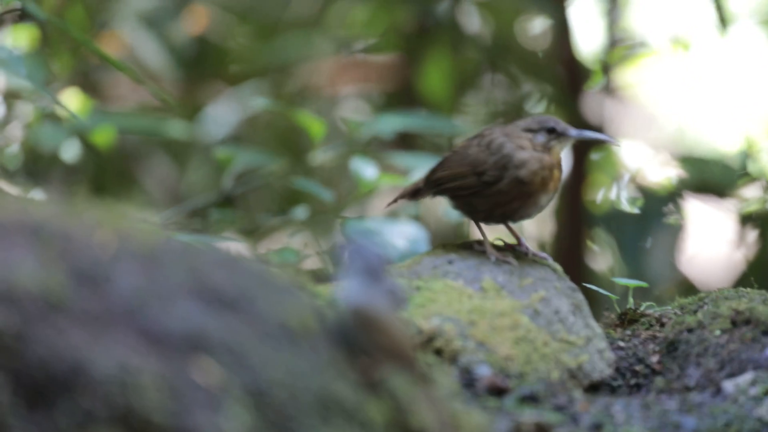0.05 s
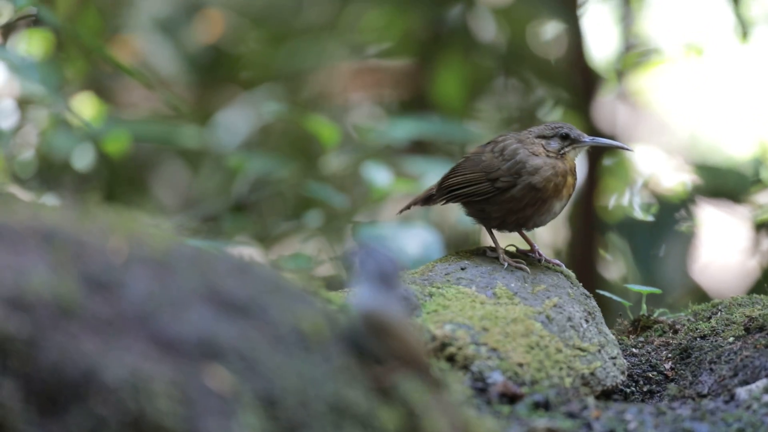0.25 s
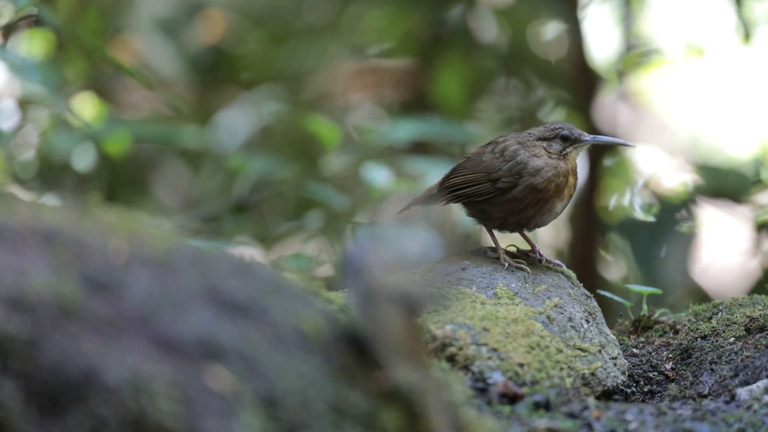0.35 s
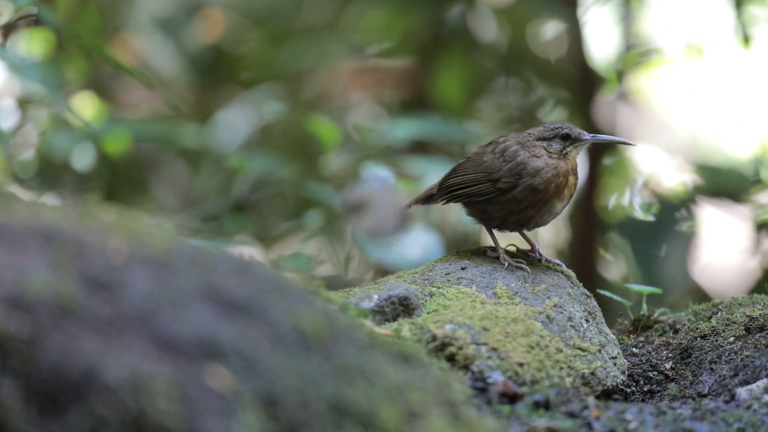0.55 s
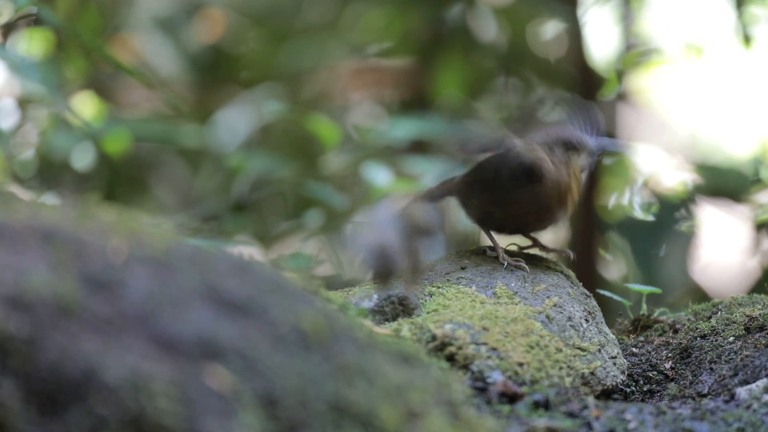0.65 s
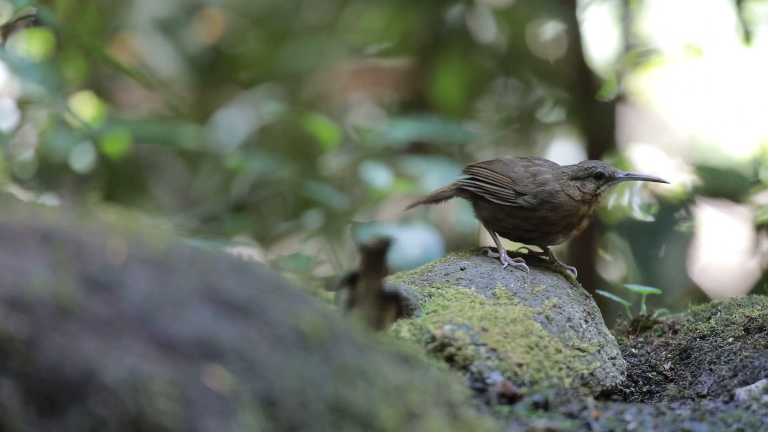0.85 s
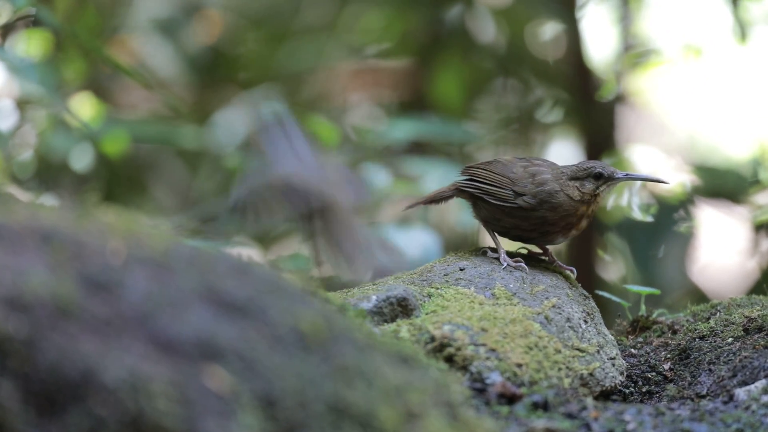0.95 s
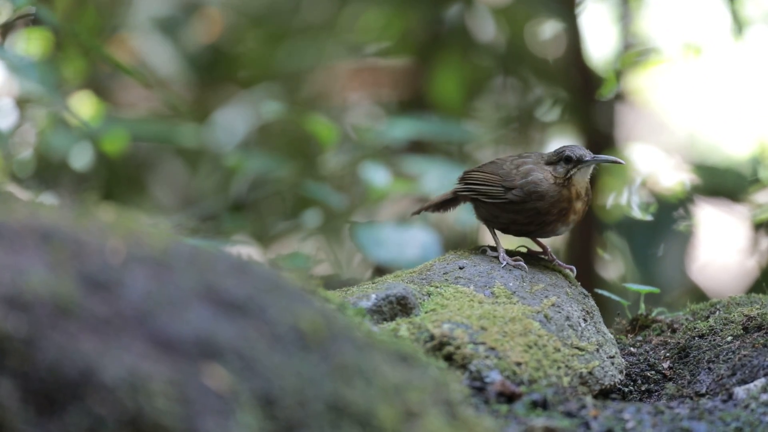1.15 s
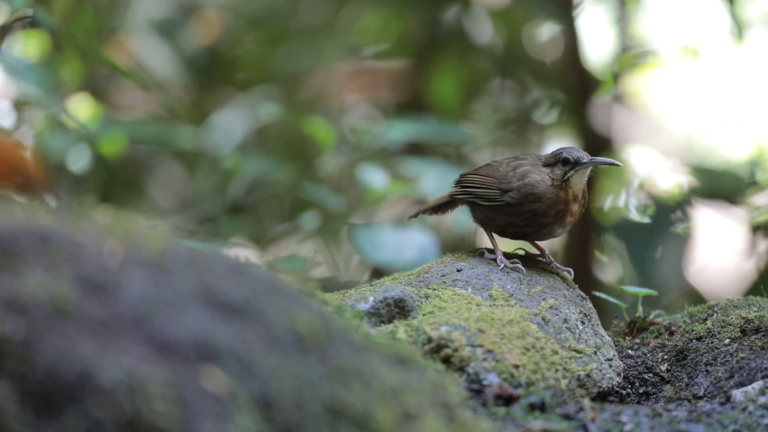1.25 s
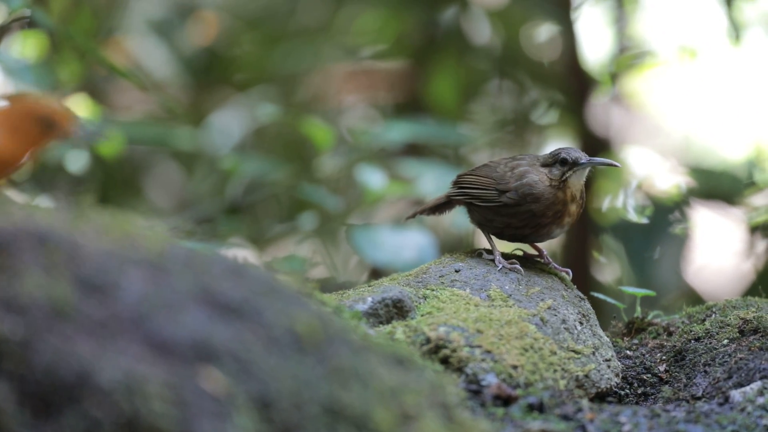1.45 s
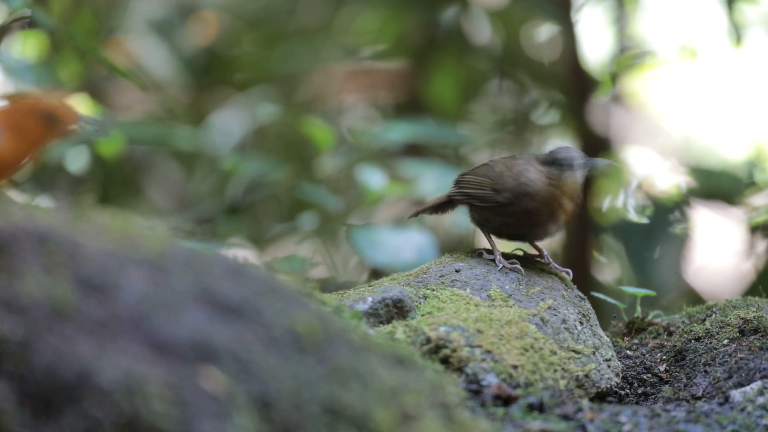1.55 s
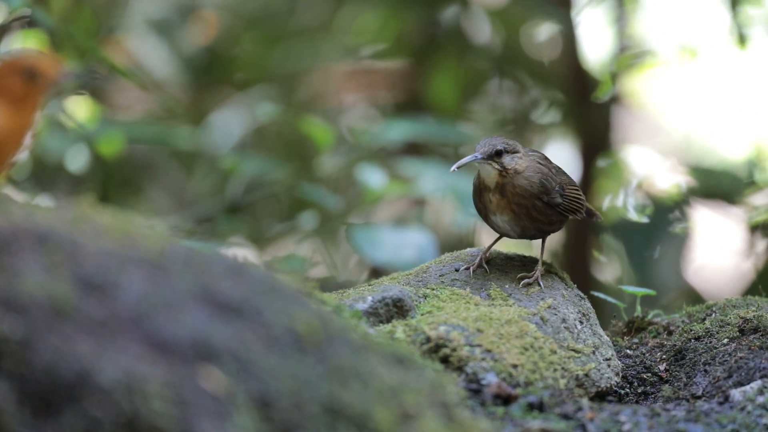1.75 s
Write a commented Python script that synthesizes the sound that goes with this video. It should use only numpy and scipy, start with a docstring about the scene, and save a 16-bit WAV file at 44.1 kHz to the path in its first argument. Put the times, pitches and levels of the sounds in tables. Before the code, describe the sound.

A thin bird whistle and two echoing downward notes sound in a quiet forest, along with whirring wings, a leaf rustle and soft hops. A second short flutter follows nearby, ending in a twig tick and a light scuff.

```python
"""In a forest, a bird gives a thin whistle and two falling slurs, which the trunks scatter into a long echo.
Small birds flit close by: one whirs past with buzzing feathers and soft thumps of air, lands and hops;
another flaps with a feathery swish. Leaves rustle, feet scuff, a far call blurs through the trees
and a twig ticks, all over a low murmur of air and a faint hiss."""
import sys
import numpy as np
from scipy import signal
from scipy.fft import rfft, irfft
from scipy.io import wavfile
from scipy.ndimage import uniform_filter1d

SR = 44100
rng = np.random.default_rng(int(sys.argv[2]) if len(sys.argv) > 2 else 0)


def generate_wav(sig):
    """Save sig (samples, or channels by samples) to the path in sys.argv[1] as 16-bit PCM at SR."""
    pcm = np.round(np.clip(np.atleast_2d(sig).T, -1, 1) * 32767).astype(np.int16)
    wavfile.write(sys.argv[1], SR, pcm)


N = 79380
FOREST_T60_S, FOREST_BUILD_S, SCATTER_DB = 0.8, 0.0082, 4.5


def undb(db):
    """Decibels to gain."""
    return 10 ** (np.asarray(db) / 20)


def clock():
    """Time of each sample in seconds."""
    return np.arange(N) / SR


def noise(points):
    """Noise of rms 1 with a spectrum of (Hz, dB) points, falling 20 dB an octave beyond its ends."""
    hz, db = np.array(points, float).T
    octave = np.log2(np.maximum(np.fft.rfftfreq(N, 1 / SR), 1))
    beyond = np.abs(octave - np.clip(octave, np.log2(hz[0]), np.log2(hz[-1])))
    gain = undb(np.interp(octave, np.log2(hz), db) - 20 * beyond)
    coloured = irfft(rfft(rng.standard_normal(N)) * gain, N)
    return coloured / coloured.std()


def walk(rate):
    """Smooth random motion of spread 1, quicker at a higher rate."""
    span = max(int(SR / rate), 1)
    motion = uniform_filter1d(uniform_filter1d(rng.standard_normal(N), span), span)
    return motion / motion.std()


def swell(at, rise, fall):
    """An envelope that peaks at the given time; rise and fall are time constants in seconds."""
    t = clock() - at
    return np.exp(np.minimum(t / rise, -t / fall))


def grain(at, hz, width, glide=0):
    """A few cycles under a bell-shaped envelope, gliding by a share of the pitch per second."""
    t = clock() - at
    pitch = hz * (1 + .012 * rng.standard_normal())
    cycles = pitch * (t + .5 * glide * t * t) + rng.random()
    return np.exp(-.5 * (t / width) ** 2) * np.sin(2 * np.pi * cycles)


def echo(sound, build_s=FOREST_BUILD_S):
    """Distinct returns from near trunks, then dense scatter from the forest behind."""
    # Slaps off the nearest trunks. Each row: delay in seconds, level in dB.
    trunks = [(.005, -9), (.0135, -8.5), (.0192, -12), (.025, -15), (.03, -5), (.042, -23), (.069, -12),
              (.08, -8), (.0965, -20)]
    t = clock()
    tail = rng.standard_normal(N) * undb(-60 * t / FOREST_T60_S) * (1 - np.exp(-t / build_s))
    tail *= undb(SCATTER_DB) / np.sqrt(np.sum(tail ** 2))
    for delay, db in trunks:
        tail[int(delay * SR)] += undb(db)
    return signal.fftconvolve(sound, tail)[:N]


def forest():
    """The bed: a low murmur of air that slowly eases, a high insect-like hiss and one brief low gust."""
    # Colours of the murmur and the hiss. Each row: frequency in Hz, spectral level in dB.
    air_colour = [(15, -54), (25, -11.5), (276, -0.5), (370, -3.5), (496, -2), (876, -6.5), (1010, -6),
                  (1310, -8.5), (1630, -9.5), (2000, -8.5), (2600, -11), (4400, -120)]
    hiss_colour = [(1200, -4.5), (2000, -18), (3200, -1.5), (4200, -10), (5300, -13.5), (6700, -2),
                   (8000, -13.5), (9300, -2.5), (11000, -10.5), (13000, -17), (15500, -20)]
    ease_db_per_s = 1.5
    murmur = undb(-56 + .8 * walk(8) - ease_db_per_s * (clock() - 1.5)) * noise(air_colour)
    hiss = undb(-58.5 + .5 * walk(10)) * noise(hiss_colour)
    gust = undb(-56) * swell(0.757, 0.038, 0.1) * noise([(25, -2), (55, 9), (75, -4), (110, -23)])
    return murmur + hiss + gust


def note(curve, echo_db, build_s=FOREST_BUILD_S):
    """One bird note: a nearly pure, slightly wavering tone with its echo."""
    waver, flutter_db, fade_s = 0.0011, 1.5, 0.0025
    times, hz, db = np.array(curve).T
    t = clock()
    pitch = np.interp(t, times, hz) * (1 + waver * walk(170))
    phase = 2 * np.pi * np.cumsum(pitch) / SR
    gate = np.clip(np.minimum(t - times[0], times[-1] - t) / fade_s, 0, 1)
    tone = np.sin(phase) + undb(-36.5) * np.sin(2 * phase) + undb(-46.5) * np.sin(3 * phase)
    tone *= gate * undb(np.interp(t, times, db) + flutter_db * walk(54))
    return tone + undb(echo_db) * echo(tone, build_s)


def song():
    """Two thin, fairly dry whistles, then two falling slurs that ring on among the trunks."""
    # Contours of the four notes. Each row: time in seconds, pitch in Hz, level in dB.
    high_whistle = [(0, 4110, -43), (.045, 4085, -52), (.088, 4098, -46.5), (.12, 4090, -73),
                    (.19, 4095, -79), (.29, 4090, -76)]
    main_whistle = [(.25, 3660, -59.5), (.285, 3710, -37), (.335, 3696, -26.5), (.372, 3690, -29),
                    (.384, 3695, -40.5), (.414, 3698, -35), (.458, 3678, -47), (.495, 3695, -33),
                    (.503, 3860, -53)]
    first_slur = [(.501, 3700, -44.5), (.508, 3560, -30.5), (.517, 3390, -33), (.527, 3090, -33),
                  (.536, 2910, -36), (.548, 2960, -35.5), (.556, 2950, -75)]
    second_slur = [(.675, 3682, -39), (.684, 3477, -35.5), (.69, 3334, -31.5), (.699, 3081, -36),
                   (.709, 2860, -31.5), (.718, 2652, -32), (.727, 2417, -35), (.735, 2177, -39),
                   (.743, 1940, -54)]
    whistles = note(high_whistle, echo_db=-11.5) + note(main_whistle, echo_db=-24)
    return whistles + note(first_slur, echo_db=6.5) + note(second_slur, echo_db=3, build_s=0.014)


def whir():
    """A bird whirs past: each downstroke is a rough feather buzz and a thump of air; upstrokes buzz."""
    # Downstrokes. Each row: time in seconds, buzz gain in dB, thump gain in dB.
    downstrokes = [(.033, -34, -39), (0.099, -38.5, -37.5), (0.164, -37, -37), (.208, -33, -33),
                   (0.245, -33, -35.5), (.298, -36.5, -38.5), (.339, -33.5, -34), (0.376, -30.5, -33),
                   (0.469, -35, -35.5), (0.499, -34, -36.5)]
    # Upstrokes. Each row: time in seconds, gain in dB.
    upstrokes = [(0.063, -39.5), (.093, -44), (.129, -41.5), (.195, -42.5), (.229, -41.5), (0.328, -44.5),
                 (.363, -40), (.464, -42.5), (0.494, -44.5)]
    air = noise([(300, 3.5), (900, -10.5), (1150, -12.5), (1500, 0),
                 (2000, -14), (2700, -15.5), (4000, -27.5)])
    wings = np.zeros(N)
    for at, buzz_db, thump_db in downstrokes:
        buzz = (undb(-2.5) * grain(at, hz=1490, width=0.00097, glide=36)
                + undb(-4.5) * grain(at + 0.00099, hz=1900, width=0.00097)
                + undb(-5.5) * air * swell(at, 0.0045, 0.0077))
        hit = at + 0.00726  # the thump lands just behind the buzz
        thump = (grain(hit, hz=395, width=0.0034, glide=-15.6)
                 + undb(-14) * grain(hit + 0.0095, hz=379, width=0.011)
                 + undb(-16) * grain(hit, hz=142.5, width=0.013))
        wings += undb(buzz_db) * buzz + undb(thump_db) * thump
    for at, db in upstrokes:
        buzz = (undb(3) * grain(at, hz=1455, width=0.0018)
                + undb(-6) * grain(at + 0.0029, hz=918, width=0.0043)
                + undb(-7.5) * grain(at + 0.0067, hz=366, width=0.0021)
                + undb(-5) * air * swell(at, 0.0018, 0.0013))
        wings += undb(db) * buzz
    return wings + undb(-24.5) * echo(wings)


def brushes(events, colour):
    """Short grainy contacts with twigs, leaves or ground, with a faint echo."""
    grit = undb(1.3 * walk(600))
    envelope = sum(undb(db) * swell(at, rise, fall) for at, db, rise, fall in events)
    contacts = envelope * noise(colour) * grit
    return contacts + undb(-19) * echo(contacts)


def leaves():
    """Brushed leaves give two soft rustles."""
    # Rustles. Each row: peak time in seconds, level in dB, rise and fall in seconds.
    rustles = [(.093, -50, 0.006, 0.026), (.145, -48.5, 0.022, 0.038)]
    # Their papery colour. Each row: frequency in Hz, spectral level in dB.
    leaf_colour = [(500, -1), (1500, -2), (2600, 3.5), (3600, -7), (5000, -13), (11000, -15.5),
                   (15000, -26)]
    return brushes(rustles, leaf_colour)


def feet():
    """Small feet scuff with a light, bright scratch."""
    # Scuffs. Each row: peak time in seconds, level in dB, rise and fall in seconds.
    scuffs = [(.16, -58, 0.0099, 0.12), (1.733, -49, .005, 0.02), (1.764, -47, 0.022, 0.029)]
    # Their scratchy colour. Each row: frequency in Hz, spectral level in dB.
    scuff_colour = [(500, -7), (2000, 3.5), (3700, 1.5), (5200, -0.5), (7000, 3), (9500, 4), (12000, -2.5),
                    (15000, -19)]
    return brushes(scuffs, scuff_colour)


def landing():
    """A light body lands and hops with dull bumps; two low thuds add weight."""
    # Bumps. Each row: peak time in seconds, level in dB, rise and fall in seconds.
    bumps = [(.62, -58, 0.011, 0.0086), (.655, -48.5, 0.0041, 0.0075), (.695, -43.5, 0.0012, 0.0056),
             (.725, -50, 0.0088, 0.0055), (.79, -48, 0.0059, 0.016), (.844, -47, 0.0025, 0.0077),
             (1.03, -88, 0.1, .04)]
    # Their muffled colour. Each row: frequency in Hz, spectral level in dB.
    body_colour = [(40, -16), (130, -2.5), (260, 5.5), (600, -4.5), (1200, -18), (4000, -24)]
    # Dry thuds. Each row: time in seconds, level in dB.
    thuds = [(0.623, -48.5), (1.531, -51)]
    weight = sum(undb(db) * grain(at, hz=149, width=0.0047) for at, db in thuds)
    return brushes(bumps, body_colour) + weight


def pips():
    """A few brief, soft notes echo among the trees."""
    # Pips. Each row: time in seconds, pitch in Hz, level in dB, width in seconds.
    pip_notes = [(0.714, 1910, -38, 0.0012), (0.776, 1990, -35, 0.0039), (.851, 1750, -44, 0.0013),
                 (1.014, 1340, -56, 0.014)]
    notes = sum(undb(db) * grain(at, hz, width) for at, hz, db, width in pip_notes)
    return notes + undb(-9) * echo(notes)


def far_call():
    """A distant call, blurred by the trees into a swell of narrow noise."""
    # The call's colour. Each row: frequency in Hz, spectral level in dB.
    call_colour = [(1800, -18), (2300, 1), (2800, 3), (3200, -12), (4000, -12.5)]
    return undb(-48.5) * swell(1.245, 0.07, 0.053) * noise(call_colour)


def flaps():
    """A second bird's wings open with a dull swish and sweep down with a bright, grainy brush."""
    # Wingbeats. Each row: time in seconds, sweep level in dB, lift level in dB, lift's lead in seconds.
    beats = [(1.269, -42.5, -39, 0.0097), (1.325, -36.5, -43, 0.014), (1.39, -40.5, -42.5, 0.0079),
             (1.441, -37.5, -45.5, 0.013), (1.506, -41.5, -40, 0.011), (1.557, -36.5, -43, 0.016)]
    # Colours of the sweep and the lift. Each row: frequency in Hz, spectral level in dB.
    sweep_colour = [(240, -61.5), (400, -5.5), (1260, -4), (1910, -2), (2190, 4), (3250, -10), (4420, -8),
                    (5050, -14), (5820, -12), (6580, -3.5), (8280, -9), (8930, -5.5), (11800, -13),
                    (15500, -29)]
    lift_colour = [(400, -37), (900, 7), (1400, 8), (2300, 1.5), (3500, -2.5), (5000, -13.5), (7000, -8.5),
                   (10000, -7), (15000, -29)]
    # A falling squeak closes every second flap. Each row: time in seconds, level in dB.
    squeaks = [(1.36, -44), (1.473, -42), (1.589, -45)]
    sweep, lift = np.zeros((2, N))
    for at, sweep_db, lift_db, lead in beats:
        sweep += undb(sweep_db) * swell(at, rise=0.007, fall=0.019)
        lift += undb(lift_db) * swell(at - lead, rise=0.0041, fall=0.02)
    squeaking = sum(undb(db) * grain(at, hz=1300, width=.0048, glide=-28) for at, db in squeaks)
    barbs = undb(1.2 * walk(620))
    wings = (sweep * noise(sweep_colour) + lift * noise(lift_colour)) * barbs + squeaking
    return wings + undb(-16.5) * echo(wings)


def twig():
    """A twig ticks twice and rings briefly."""
    # Ticks. Each row: peak time in seconds, level in dB, rise and fall in seconds.
    ticks = [(1.717, -38.5, 0.00037, 0.0011), (1.7228, -36, 0.0004, 0.0035)]
    # Their crisp colour. Each row: frequency in Hz, spectral level in dB.
    twig_colour = [(500, -8.5), (2500, -9), (3850, -1), (5000, -13), (7000, -5.5), (11500, -5.5),
                   (15000, -39.5)]
    ring_hz, ring_db, ring_s = 3810, -7.5, 0.0034
    ring = sum(undb(db + ring_db) * swell(at, rise, ring_s) for at, db, rise, _ in ticks)
    return brushes(ticks, twig_colour) + ring * np.sin(2 * np.pi * ring_hz * clock())


def scene():
    """Calls, wings and small contacts over the forest bed, in mono."""
    calls = song() + pips() + far_call()
    wings = whir() + flaps()
    contacts = leaves() + feet() + landing() + twig()
    return (calls + wings + contacts + forest())[None]


def record(dry):
    """A steep low-pass trims the very top."""
    top_hz = 15620
    return signal.sosfilt(signal.ellip(10, .1, 80, top_hz, fs=SR, output="sos"), dry)


dry = scene()
out = record(dry)
generate_wav(out)
```